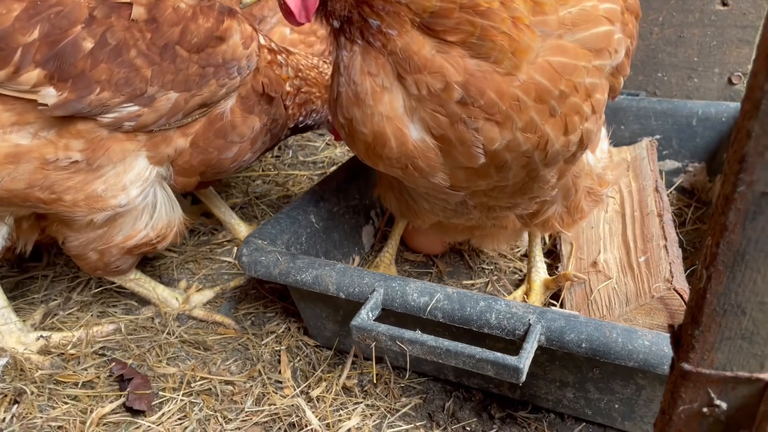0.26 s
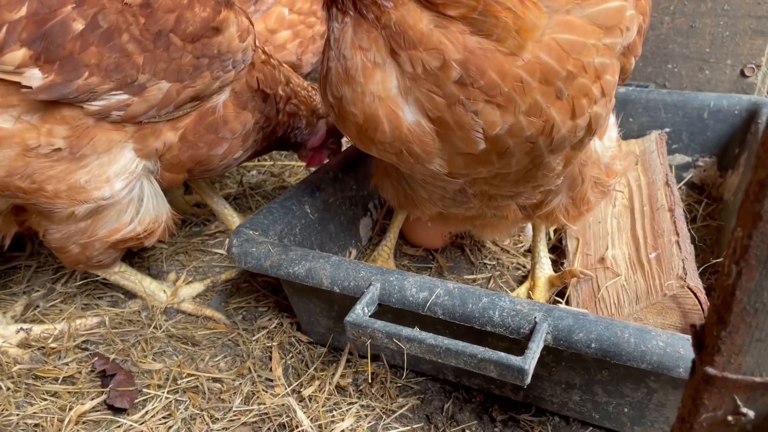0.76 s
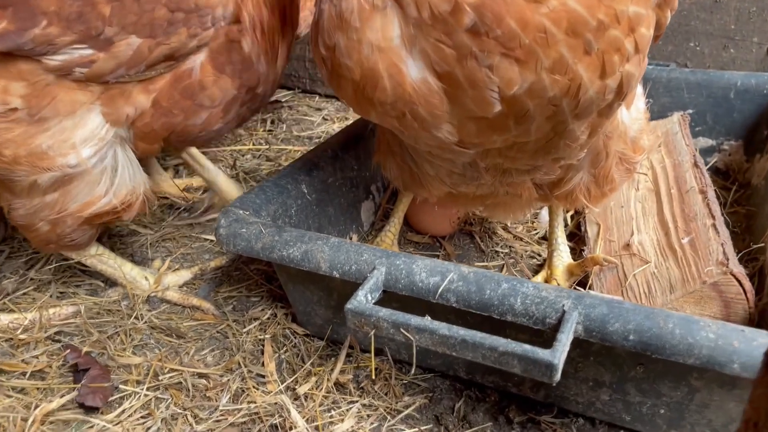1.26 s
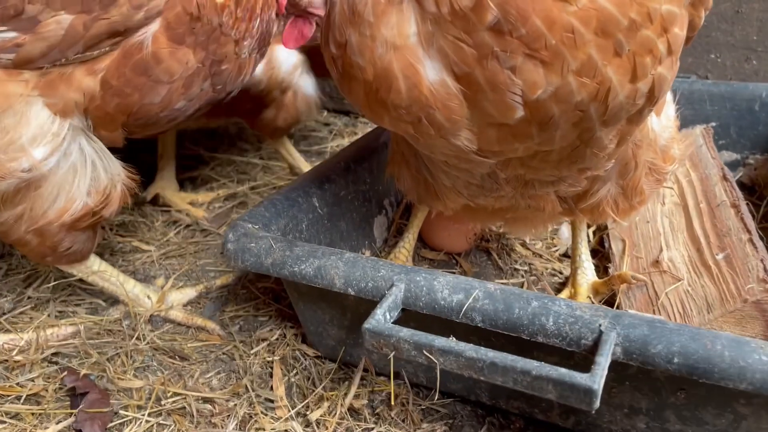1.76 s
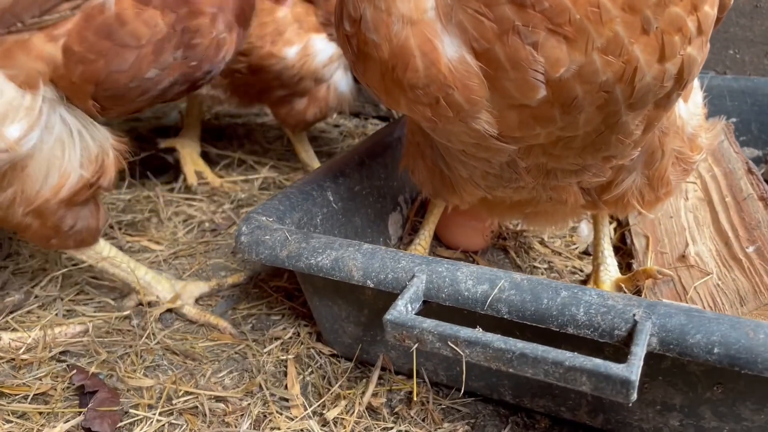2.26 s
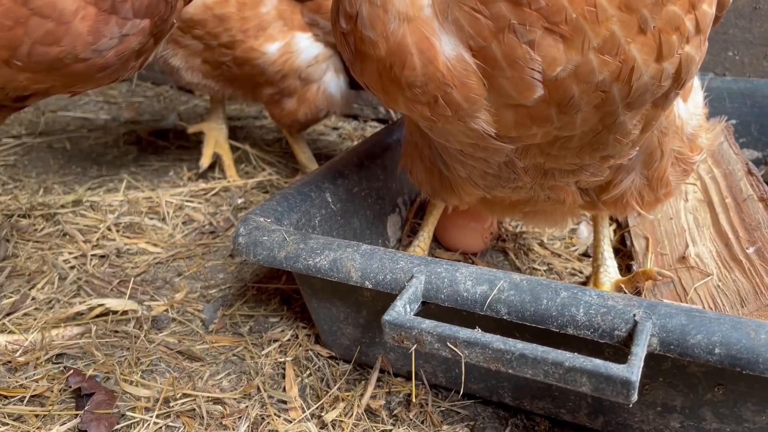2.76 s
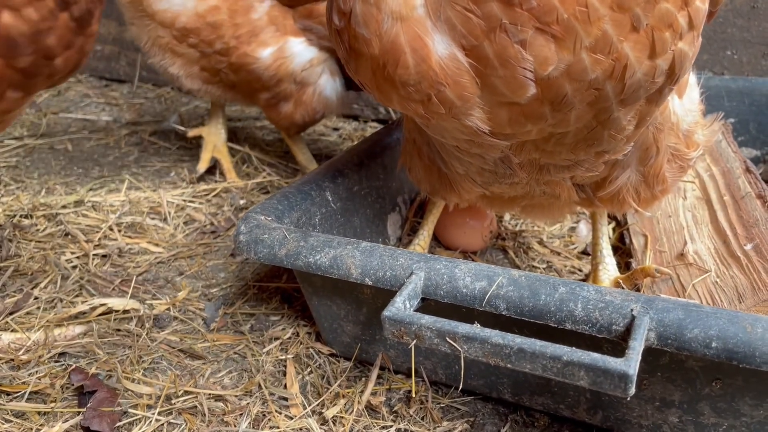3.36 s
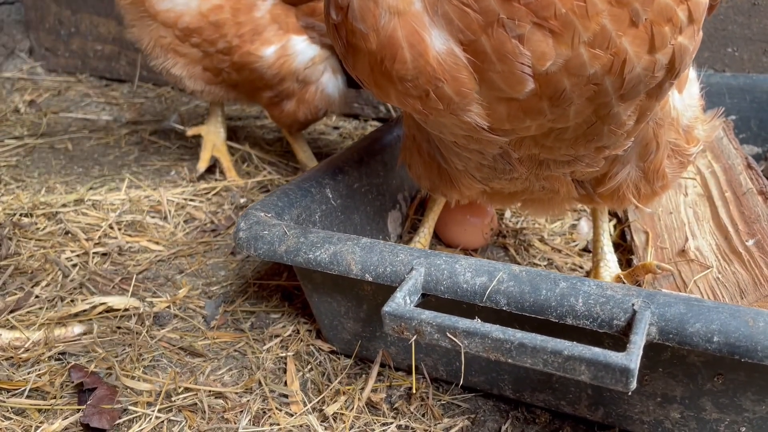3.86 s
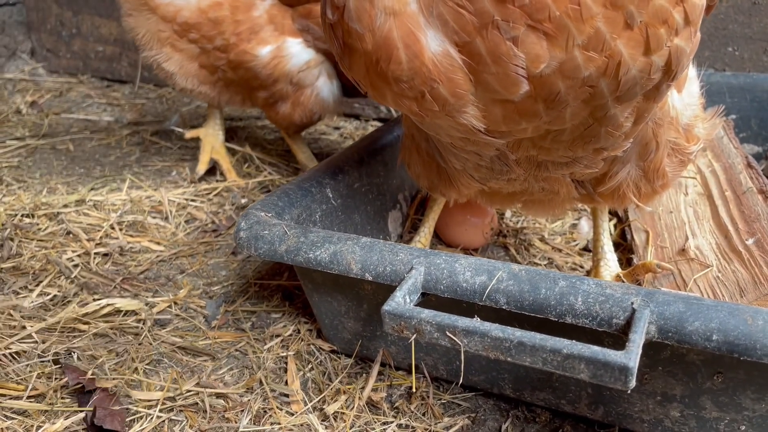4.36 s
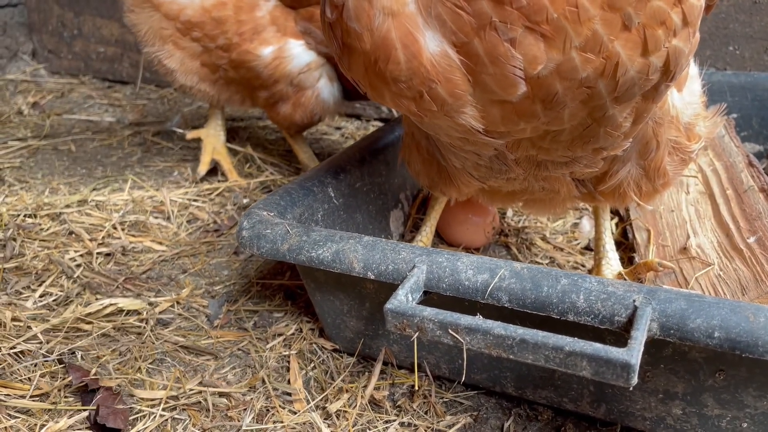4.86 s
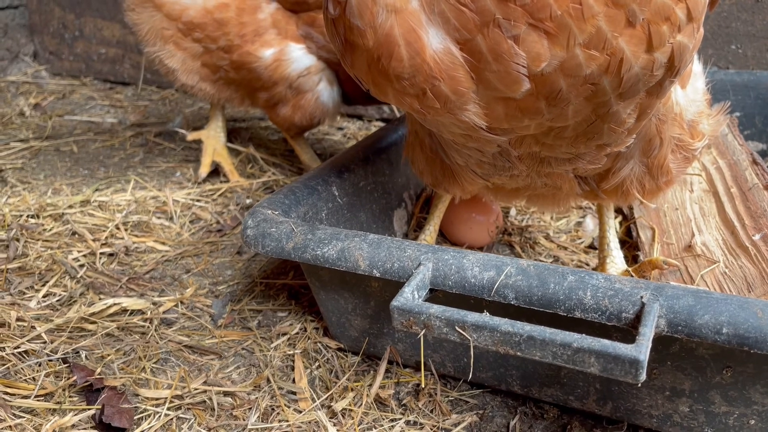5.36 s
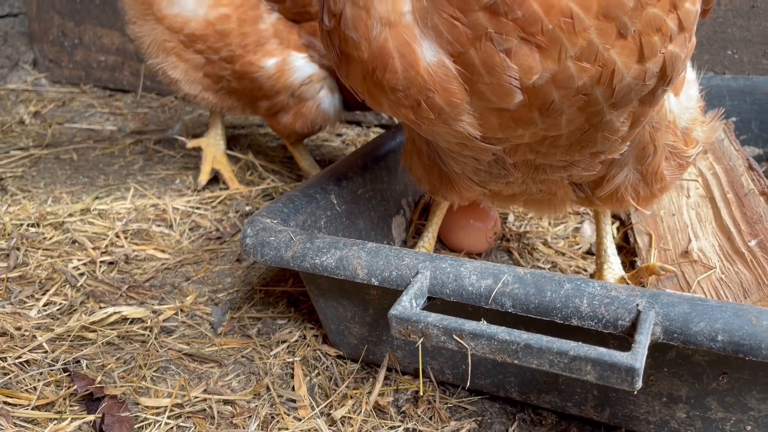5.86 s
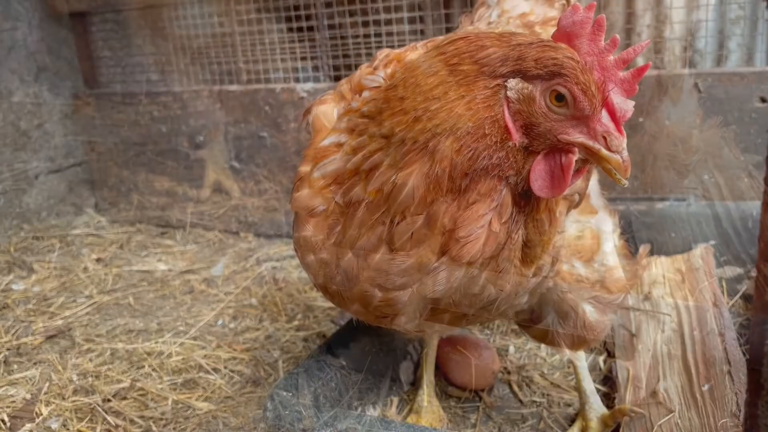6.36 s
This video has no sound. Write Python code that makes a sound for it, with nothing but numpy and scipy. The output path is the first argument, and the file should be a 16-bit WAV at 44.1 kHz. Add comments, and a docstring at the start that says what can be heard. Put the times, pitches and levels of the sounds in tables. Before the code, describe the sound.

Hoarse, drawn-out hen calls and a few short clucking notes, close up, over crackling straw, beak pecks and faint outdoor rumble.

```python
"""A low outdoor rumble with a faint hum lies under stirring straw; feet scuff, beaks peck, wood knocks, and soft
low thumps sound. A hen over her egg in a plastic tub then gives wavering calls: two thin squeaks, each breaking
into a raspy moan, with short calls, a third moan and a last short call after them. A small bird chirps outside
the wooden coop. Calls are drifting oscillators with sidebands and husk, straw and rumble are coloured noise,
pecks are noise bursts, taps and knocks are decaying sines; wall echoes and a diffuse tail make the coop."""
import sys
import numpy as np
from scipy import signal
from scipy.fft import rfft, irfft, next_fast_len
from scipy.io import wavfile

SR = 44100
rng = np.random.default_rng(int(sys.argv[2]) if len(sys.argv) > 2 else 0)


def dump_mix(stems):
    """Bounce the given channels to the path in sys.argv[1] as a 16-bit WAV at rate SR."""
    frames = np.atleast_2d(stems).T  # one column per channel
    limited = np.clip(frames, -1, 1)  # hard clip at full scale
    pcm = np.round(limited * 32767).astype(np.int16)
    wavfile.write(sys.argv[1], SR, pcm)


N = 291942
TIME = np.arange(N) / SR

# crisp top of straw and pecks: freq_hz, density_db_per_hz
CRISP_SPECTRUM = [(300, -76), (8000, -7), (9200, -5.5), (11000, -3), (13000, -13.5), (16000, -11)]


def from_db(db):
    """Decibels to amplitude gain."""
    return 10 ** (np.asarray(db) / 20)


def rms_one(x):
    """Scale to unit power."""
    return x / np.sqrt(np.mean(x ** 2) + 1e-20)


def in_time(rows):
    """Interpolate each column after time_s at every sample."""
    time_s, *columns = np.transpose(rows)
    return [np.interp(TIME, time_s, column) for column in columns]


def at_hz(points, hz):
    """Read a spectrum on a log-frequency axis."""
    freq_hz, value = np.array(points).T
    return np.interp(np.log(np.maximum(hz, 1)), np.log(freq_hz), value)


def drift(rate_hz):
    """Smooth random curve of unit rms: noise through two equal low-pass poles at rate_hz."""
    step = 20  # computed at SR / 20, then interpolated
    pole = np.exp(-2 * np.pi * rate_hz * step / SR)
    white = rng.standard_normal(N // step + 2002)
    slow = signal.lfilter([1], [1, -2 * pole, pole * pole], white)[2000:]
    return np.interp(np.arange(N) / step, np.arange(len(slow)), rms_one(slow))


def coloured(pair, spectrum):
    """Shape two unrelated signals and mix them as mid and side to a set stereo likeness; unit rms."""
    # freq_hz, left_right_likeness
    likeness = [(30, 0.065), (70, 1), (140, 0.85), (280, 0.78), (600, 0.12), (2000, 0.061), (6000, 0.28),
                (12000, 0.39)]
    size = next_fast_len(N)
    hz = np.arange(size // 2 + 1) * SR / size
    mid, side = rfft(pair, size) * from_db(at_hz(spectrum, hz))
    alike = np.clip(at_hz(likeness, hz), -1, 1)
    stereo = np.sqrt(1 + alike) * mid + np.sqrt(1 - alike) * side * [[1], [-1]]
    return rms_one(irfft(stereo, size)[:, :N])


def noise(spectrum):
    """Smooth stereo noise with the given spectrum."""
    return coloured(rng.standard_normal((2, N)), spectrum)


def gate(start_s, end_s, fade_s):
    """One between two times, with linear ramps inside."""
    return np.clip(np.minimum(TIME - start_s, end_s - TIME) / fade_s, 0, 1)


def turning(hz):
    """Phase of an oscillator that follows a pitch."""
    return 2 * np.pi * np.cumsum(hz) / SR


def coop(x, wet_db):
    """Diffuse ring of the coop: exponentially decaying noise, independent left and right."""
    t60_s, rise_s = 0.36, 0.0049
    age = TIME[:SR // 2]
    envelope = from_db(-60 * age / t60_s) * np.minimum(age / rise_s, 1)
    tail = rng.standard_normal((2, len(age))) * envelope
    tail /= np.sqrt(np.sum(tail ** 2, axis=1, keepdims=True))
    return from_db(wet_db) * signal.fftconvolve(np.atleast_2d(x), tail, axes=1)[:, :N]


def boards(x):
    """Early echoes off the nearest boards: delayed copies with a gain for each side."""
    # delay_s, left_gain, right_gain
    echoes = [(.0032, 0.0024, -0.19), (.0084, -0.46, 0.56), (0.019, -.15, .22), (0.0193, 0.077, -0.36)]
    return sum(np.interp(TIME - delay_s, TIME, x) * np.array([[left], [right]])
               for delay_s, left, right in echoes)


def rumble():
    """Low outdoor noise swells and sinks slowly."""
    # freq_hz, density_db_per_hz
    spectrum = [(15, -37), (25, -12), (54, 4), (113, -4.5), (152, -5), (243, -10.5), (264, -16),
                (355, -17.5), (439, -21), (521, -26.5), (604, -24), (1300, -34), (1780, -40.5), (2970, -53),
                (4000, -62.5), (5200, -88.5), (8800, -120)]
    # time_s, level_db
    level_curve = [(0, -37), (1.0, -36), (1.5, -34.5), (3.0, -37.5), (3.6, -34.5), (5.0, -37.5), (5.9, -35),
                   (6.15, -39), (6.6, -40)]
    return from_db(in_time(level_curve)[0]) * noise(spectrum)


def hum(waver_share=0.01193, swell_db=4.0):
    """Faint low tones outside drift in pitch and level around their means."""
    # mean_pitch_hz, mean_level_db
    tones = [(146, -55), (238, -53), (389, -65)]
    out = 0
    for hz, db in tones:
        level = np.sqrt(2) * from_db(db + swell_db * drift(3))
        out = out + level * np.sin(turning(hz * (1 + waver_share * drift(7.96))))
    return out


def rustle_levels():
    """Each movement builds and dies away exponentially over a faint stir; gains of rustle and crisp top."""
    # steps and feather shakes: peak_s, rise_s, fall_s, rustle_rel_db, crisp_rel_db
    movements = [(0.57, 0.11, 0.87, -69, -67), (0.926, 0.0072, 0.025, -45.5, -71),
                 (1.015, .02, 0.04, -64, -84), (1.419, 0.19, 0.17, -62, -55),
                 (1.547, 0.0099, 0.057, -50, -45.5), (1.69, 0.091, 0.06, -56.5, -59.5),
                 (2.08, 0.2, 0.16, -65.5, -63), (2.341, 0.097, 0.12, -55, -46),
                 (2.429, .02, 0.017, -56, -50), (2.975, 0.065, 0.061, -57, -47),
                 (3.249, 0.091, 0.052, -69, -56.5), (3.393, 0.018, 0.024, -60, -51),
                 (3.72, 0.083, 0.14, -69, -60.5), (3.891, 0.025, 0.013, -45, -43.5),
                 (4.071, 0.066, 0.081, -49, -39.5), (4.42, 0.065, 0.08, -56.5, -56),
                 (4.8, 0.036, 0.11, -63.5, -47.5), (5.149, 0.088, 0.16, -92, -58),
                 (5.551, 0.036, 0.041, -46, -37), (5.753, 0.023, 0.076, -53.5, -48),
                 (5.89, 0.014, 0.032, -63, -49.5), (6.099, 0.17, 0.094, -87, -58.5),
                 (6.55, 0.17, 0.046, -83.5, -63.5)]
    stir_rel_db, stir_crisp_rel_db = -78, -73
    power = from_db([[stir_rel_db], [stir_crisp_rel_db]]) ** 2
    for peak_s, rise_s, fall_s, rustle_db, crisp_db in movements:
        distance = np.maximum((peak_s - TIME) / rise_s, (TIME - peak_s) / fall_s)
        swell = np.exp(-distance.clip(0, 20))
        power = power + (from_db([[rustle_db], [crisp_db]]) * swell) ** 2
    return np.sqrt(power)


def straw(grain_db=2.5, rustle_db=8.5, crisp_db=0.5, snaps_per_s=35, snap_db=19):
    """Stalks rub in dense grains of uneven size; sparse random snaps stand out."""
    # freq_hz, density_db_per_hz
    spectrum = [(300, 9.5), (700, -11), (1500, 2), (2500, 2.5), (4000, 1), (6500, -3.5), (7500, -8),
                (8300, -16.5), (16000, -49)]
    rustle, crisp = rustle_levels()
    grain_level = from_db(grain_db * np.clip(drift(610), -3, 3) + drift(24))
    grains = rng.standard_normal((2, N)) * grain_level
    snaps = (rng.random(N) < snaps_per_s / SR) * rng.standard_normal(N) * from_db(snap_db)
    grains = grains + snaps * np.array([[1], [.5]])  # mid, side
    body = rustle * from_db(rustle_db) * coloured(grains, spectrum)
    return body + crisp * from_db(crisp_db) * coloured(grains, CRISP_SPECTRUM)


def scuffs():
    """A foot drags on tub or floor: a Gaussian swell of dull, grainy noise."""
    # centre_s, length_s, level_db
    drags = [(0.303, 0.013, -46.5), (0.579, 0.082, -45), (0.75, 0.15, -58.5), (0.827, 0.016, -50),
             (0.9, 0.041, -48), (0.957, 0.019, -40), (1, 0.045, -51.5), (1.095, 0.021, -43),
             (1.678, 0.039, -46), (5.572, 0.034, -51), (6.557, 0.076, -47.5)]
    # freq_hz, density_db_per_hz
    spectrum = [(200, -31), (600, 16.5), (1200, 6), (2500, -3.5), (4000, -24), (8000, -38)]
    swell = sum(from_db(db) * np.exp(-2 * ((TIME - s) / length_s) ** 2) for s, length_s, db in drags)
    return swell * from_db(4 * np.tanh(drift(70))) * noise(spectrum)


def pecks(tail_db=-16, split_hz=8000):
    """Pecks and snapping straws: a dry crack of noise followed by a short scatter of straw."""
    # start_s, level_db, crisp_top_vs_body_db
    strikes = [(0.498, -62, 2), (0.9213, -33, -9), (1.6785, -44.5, 11), (1.681, -34.5, 18),
               (1.6925, -47, -4), (2.244, -39, 16), (2.413, -33, 25.5), (2.8506, -38, 18),
               (2.9475, -31.5, 4), (2.983, -27, 6.5), (3.2819, -20.5, 0), (3.857, -19, -2.5),
               (3.8882, -33, -12), (3.906, -16.5, -11), (3.9582, -16.5, 9), (4.004, -26.5, -6),
               (4.064, -16.5, -3), (4.328, -20.5, -3), (4.414, -37, 8), (4.446, -42, 6), (4.4629, -32, -6),
               (4.851, -29.5, 22), (4.8918, -35, 6), (5.124, -38, 6), (5.449, -40, -4),
               (5.4928, -33.5, -7.5), (5.74, -30, 12)]
    # freq_hz, density_db_per_hz
    body_spectrum = [(1120, -19), (1900, -3.5), (2170, -2), (2810, -4.5), (5020, -12.5), (5640, -13.5),
                     (6390, -5.5), (7980, -30), (11000, -11.5), (16000, -26)]
    crack_s, scatter_s = .0013, .012
    body, top = np.zeros(N), np.zeros(N)
    age = TIME[:SR // 10]
    shape = np.exp(-age / crack_s) + from_db(tail_db) * np.exp(-age / scatter_s)
    for start_s, level_db, treble_db in strikes:
        at = round(start_s * SR)
        total = np.hypot(1, from_db(treble_db))  # body and top share the power
        body[at:at + len(age)] += shape * from_db(level_db) / total
        top[at:at + len(age)] += shape * from_db(level_db + treble_db) / total
    dull = signal.butter(4, split_hz, fs=SR, output="sos")
    knock = body * rms_one(signal.sosfilt(dull, noise(body_spectrum)))
    return knock + top * noise(CRISP_SPECTRUM) + coop(knock, wet_db=-10)


def thumps():
    """Soft, deep thumps: low sines under a Gaussian swell."""
    # centre_s, pitch_hz, level_db
    thump_rows = [(0.75, 70, -29.5), (0.995, 159, -35), (1.125, 63.5, -27), (1.24, 73, -29.5),
                  (5.481, 115, -38.5), (5.96, 127, -32.5)]
    width_s = 0.031
    return sum(from_db(db) * np.exp(-((TIME - s) / width_s) ** 2) * np.sin(2 * np.pi * hz * (TIME - s))
               for s, hz, db in thump_rows)


def knocks(wet_db=-6):
    """A foot bumps the wood: one short, hollow decaying note."""
    # start_s, level_db
    bumps = [(0.878, -34), (0.919, -34), (0.946, -35)]
    pitch_hz, t60_s, rise_s = 1217, .04, .002
    out, age = np.zeros(N), TIME[:SR // 10]
    ring = np.sin(2 * np.pi * pitch_hz * age) * from_db(-60 * age / t60_s) * np.minimum(age / rise_s, 1)
    for start_s, db in bumps:
        at = round(start_s * SR)
        out[at:at + len(age)] += from_db(db) * ring
    return out + coop(out, wet_db)


def squeaks(flutter_db=4.5, level_db=-4.0, octave_db=-42, under_ratio=.88):
    """The tight syrinx gives an unsteady near-sine; its other side sounds weakly a little lower."""
    # one curve a squeak: time_s, pitch_hz, level_rel_db
    curves = [
        [(1.08, 651, -52), (1.112, 635, -42), (1.125, 807, -35.5), (1.25, 760, -35), (1.385, 820, -34.5),
         (1.46, 794, -28), (1.5, 798, -32), (1.58, 812, -27.5), (1.628, 858, -39), (1.643, 936, -17.5),
         (1.668, 866, -37.5), (1.685, 858, -21), (1.705, 840, -33), (1.76, 887, -17.5), (1.81, 839, -33.5),
         (1.882, 882, -14), (1.905, 960, -21), (1.915, 869, -25.5), (1.96, 964, -27)],
        [(3.405, 930, -45), (3.443, 1020, -24.5), (3.457, 1017, -33.5), (3.468, 940, -24), (3.51, 952, -23.5),
         (3.55, 910, -33)],
    ]
    # lower tone of each squeak: level_vs_main_tone_db
    under_levels = [-8.5, -13]
    out = 0
    for rows, under_db in zip(curves, under_levels):
        hz, db = in_time(rows)
        phase = turning(hz * (1 + .018 * drift(70)))
        under_phase = turning(hz * under_ratio * (1 + 0.0643 * drift(68)))
        tone = np.sin(phase) + from_db(octave_db) * np.sin(2 * phase)
        tone = tone + from_db(under_db) * np.sin(under_phase)
        level = from_db(db + level_db + flutter_db * np.tanh(drift(41)))
        out = out + np.sqrt(2) * tone * level * gate(rows[0][0], rows[-1][0], 0.011)
    return out


def taps():
    """Beak or claw hits the tub: the stiff plastic rings briefly in several modes."""
    # start_s, level_db
    contacts = [(1.681, -34), (1.6835, -34), (1.69, -40.5), (4.064, -18.5)]
    # mode_hz, mode_level_rel_db, t60_s
    tub_modes = [(2300, -8, .025), (3300, -5, .015), (4150, -3.5, .018), (4650, 1, .014), (5050, -1, .018),
                 (6200, -4, .012)]
    out, age = np.zeros((2, N)), TIME[:SR // 10]
    for start_s, db in contacts:
        at = round(start_s * SR)
        for hz, mode_db, t60_s in tub_modes:
            tap_hz = hz * (1 + 0.0051 * rng.standard_normal())
            ring = np.sin(2 * np.pi * tap_hz * age + rng.uniform(0, np.pi, (2, 1)))
            out[:, at:at + len(age)] += from_db(db + mode_db - 60 * age / t60_s) * ring
    return out + coop(out, wet_db=-19)


def bird(partial_db=-7):
    """Husky chirps glide ever faster to their end pitch; strongest on their second harmonic."""
    # start_s, length_s, start_pitch_hz, end_pitch_hz, level_db
    chirp_rows = [(1.862, 0.04, 3450, 3400, -58), (5.082, 0.085, 3240, 2630, -48.5),
                  (5.665, 0.061, 2440, 2130, -56), (5.68, 0.045, 4640, 4420, -55),
                  (6.405, 0.057, 3460, 3100, -62.5), (6.516, 0.074, 3940, 3580, -61.5)]
    out, shake = np.zeros(N), 1 + .05 * drift(400)
    for start_s, length_s, start_hz, end_hz, db in chirp_rows:
        span = (TIME > start_s) & (TIME < start_s + length_s)
        along = (TIME[span] - start_s) / length_s
        phase = turning((start_hz + (end_hz - start_hz) * along ** 2) * shake[span]) / 2
        partials = np.sin(3 * phase) + np.sin(4 * phase) / 2
        tone = np.sin(2 * phase) + from_db(partial_db) * partials
        out[span] += from_db(db) * np.sin(np.pi * along) * tone
    return out


def husk_noise():
    """Slow complex noise, centred a little below zero: on a tone it becomes a hoarse band."""
    width_hz, below_hz = 90, 25
    sos = signal.butter(3, width_hz, fs=SR, output="sos")
    real, imaginary = rms_one(signal.sosfilt(sos, rng.standard_normal((2, N))))
    return (real + 1j * imaginary) / np.sqrt(2) * np.exp(-2j * np.pi * below_hz * TIME)


def octave_breaks():
    """Gain of the octave: it rattles in the rough stretches and drops out at each catch."""
    # time_s, rattle_depth_0_to_1
    depth_curve = [(2.2, .6), (2.35, .6), (2.37, .05), (2.57, .05), (2.6, .45), (2.69, .2), (2.76, .5),
                   (2.81, .5), (2.84, .1), (3.0, .3), (3.55, .5), (3.65, .1), (4.4, .05), (4.5, .8),
                   (4.7, .7), (4.8, .45), (4.83, .05)]
    # instants at which the voice catches: time_s
    catch_times = [2.468, 2.61, 2.662, 2.728, 2.765, 2.817, 3.04, 3.783, 3.808, 3.882, 4.024, 4.059, 4.77,
                   4.875, 4.929]
    rattle_hz, catch_s = 66, .0055
    rattle = in_time(depth_curve)[0] * np.sin(turning(rattle_hz * (1 + .22 * drift(40))))
    held = np.prod([1 - np.exp(-((TIME - s) / catch_s) ** 2) for s in catch_times], axis=0)
    return (1 + rattle) * held


def calls(curves, jitter, flutter_db, octave_db, base_db, rasp_db, beat_hz, low_share, buzz_db=0,
          beak_half_width_hz=170):
    """Syrinx harmonics through the throat; irregular beating adds sidebands and hoarseness at the octave."""
    # overtone gain against the whole voice: freq_hz, gain_rel_db
    throat = [(1800, -32), (2300, -56), (2870, -38), (3000, -46), (3450, -43), (3650, -48), (4100, -56),
              (4650, -48), (5250, -51), (5800, -62)]
    # nasal resonance of the open beak: time_s, centre_hz, gain_rel_db
    beak = [(1.95, 3350, -50), (2.22, 3150, -37), (2.3, 3215, -41), (2.56, 3340, -34), (2.63, 3194, -28.5),
            (2.74, 3230, -26.5), (2.805, 3544, -23), (2.87, 3637, -39), (3.05, 3600, -33.5),
            (3.54, 2970, -30), (3.58, 3060, -23.5), (3.63, 2970, -44), (3.7, 3210, -47.5),
            (4.1, 3360, -49.5), (4.2, 2105, -26), (4.42, 2180, -22), (4.5, 4020, -51), (4.65, 4070, -44),
            (4.8, 4120, -38.5), (4.92, 4130, -38), (6.4, 3480, -58)]
    # pitch stagger at register changes: time_s, spread_share_of_pitch
    unsteady = [(1.92, .035), (2.05, .035), (2.065, .005), (2.1, .005), (2.125, .045), (2.16, .015),
                (2.22, .035), (2.26, 0), (3.5, 0), (3.53, .03), (3.61, 0), (4.48, 0), (4.5, .018),
                (4.6, .012), (4.75, 0), (6.49, 0), (6.52, .04), (6.56, .08)]
    husk_db = -3.5
    third_husk, least_upper_husk = 1.4, .5  # noise against tone: third harmonic, those above
    out = np.zeros(N)
    beak_hz, beak_db = in_time(beak)
    quaver = np.sin(turning(13 * (1 + 0.235 * drift(12.1))))  # muscles tremble in pitch and loudness
    stagger = in_time(unsteady)[0] * drift(90)
    wobble = 1 + jitter * (quaver + drift(45)) + 0.0055 * drift(200) + stagger
    beat = turning(beat_hz * (1 + 0.2 * drift(60)))
    flutter = flutter_db * np.tanh(drift(36) + quaver / 2)
    sway = flutter_db * np.tanh(drift(71))  # the fundamental swells on its own
    breaks = octave_breaks()
    grit, rattle = from_db(2.5 * np.tanh(drift(90))), drift(130)
    husk = from_db(husk_db) * husk_noise()
    upper_husk = husk_noise()
    for rows in curves:
        start_s, end_s = rows[0][0], rows[-1][0]
        span = (TIME > start_s) & (TIME < end_s)
        hz, first, second, rasp = [column[span] for column in in_time(rows)]
        phase, b, shake = turning(hz * wobble[span]), beat[span], flutter[span]
        fundamental = from_db(first + base_db + sway[span]) * np.sin(phase)
        octave = from_db(second + octave_db + shake) * breaks[span] * np.sin(2 * phase)

        # the throat rings near 1 kHz, so the sideband below the octave outweighs the one above
        sidebands = np.sin(2 * phase - b) + 0.094 * np.sin(2 * phase + b)
        sidebands += 0.1 * np.sin(phase + b) + low_share * np.sin(phase - b)
        sidebands += np.imag(husk[span] * np.exp(2j * phase))

        # the raspier the voice, the more its overtones smear
        effort = np.sqrt(from_db(first) ** 2 / 2 + from_db(second) ** 2 + from_db(rasp) ** 2)
        rasp_share = from_db(rasp) / effort
        smear = (.1 + 1.5 * rasp_share) * rattle[span]
        buzz = 0
        for k in range(3, 11):
            off_centre = (k * hz - beak_hz[span]) / beak_half_width_hz
            nasal = from_db(beak_db[span]) / (1 + off_centre ** 2)
            hoarse = third_husk if k == 3 else least_upper_husk + rasp_share
            hoarse_band = np.imag(upper_husk[span] * np.exp(1j * k * phase))
            overtone = np.sin(k * phase + smear) + hoarse * hoarse_band
            buzz = buzz + (from_db(at_hz(throat, k * hz)) + nasal) * overtone

        # rasp moves against the octave's flutter
        rough = from_db(rasp + rasp_db - shake / 2) * sidebands
        voice = fundamental + octave + grit[span] * (rough + from_db(buzz_db) * effort * buzz)
        out[span] += np.sqrt(2) * voice * gate(start_s, end_s, 0.008)[span]
    return out


def moans():
    """Full register: a strong, raspy octave over the fundamental, with sidebands from a fast, irregular beat."""
    # one curve a moan: time_s, pitch_hz, fundamental_rel_db, octave_rel_db, rasp_rel_db
    curves = [
        [(1.915, 690, -32.5, -62.5, -65), (2.0, 690, -32, -53, -63), (2.09, 679, -22, -44, -69),
         (2.13, 641, -34, -43, -37), (2.17, 664.5, -27.5, -48, -51), (2.235, 650.4, -29.5, -37, -51.5),
         (2.258, 583.4, -27, -29, -31.5), (2.3, 574.5, -33.5, -43, -30.5), (2.354, 586.4, -25, -28.5, -25.5),
         (2.378, 571.6, -40, -18, -40.5), (2.406, 578, -26.5, -26.5, -31), (2.436, 562.7, -38, -16.5, -45.5),
         (2.472, 575, -27.5, -27, -33), (2.5, 575.8, -38, -22.5, -27.5), (2.565, 576, -28.5, -20.5, -47.5),
         (2.594, 570.4, -31, -25.5, -31), (2.625, 577, -32, -21, -26.5), (2.658, 580.3, -32, -29, -33),
         (2.7, 572.4, -34.5, -21, -37), (2.772, 582.4, -31, -32, -36), (2.836, 593.7, -27, -21, -43),
         (2.91, 604.3, -30, -21.5, -39), (2.975, 598, -34.5, -28.5, -36.5), (3.025, 588, -30, -30, -47),
         (3.08, 559, -62, -46, -65)],
        [(3.515, 673, -40, -55.5, -49), (3.532, 667, -26.5, -64, -39.5), (3.542, 632, -26.5, -34, -39.5),
         (3.588, 631.6, -28.5, -35, -58), (3.63, 559.3, -31.5, -25, -49.5), (3.72, 579, -27.5, -27.5, -49),
         (3.775, 555.7, -27.5, -17.5, -52), (3.835, 574, -26, -21.5, -51), (3.862, 542.5, -29, -16.5, -46),
         (3.886, 573, -31.5, -17, -41.5), (3.916, 543.4, -40, -16.5, -52), (3.945, 573.4, -26.5, -21.5, -47),
         (4.01, 572, -29.5, -23.5, -63), (4.076, 569, -28, -20.5, -47.5), (4.1, 583.3, -26.5, -21.5, -56),
         (4.128, 571, -41, -22, -34), (4.14, 613, -14, -49, -34)],
        [(4.47, 660, -42, -56, -51), (4.5, 597, -34.5, -41, -44.5), (4.57, 597.5, -34, -38, -37),
         (4.615, 600, -29, -27, -34), (4.655, 598, -28, -44, -33), (4.68, 592, -34, -28.5, -25),
         (4.7, 605, -27.5, -33.5, -42), (4.725, 595, -32, -27.5, -33), (4.76, 592, -27, -28.5, -39),
         (4.785, 599.4, -31.5, -25.5, -44.5), (4.846, 598.4, -30, -20.5, -54),
         (4.886, 590.6, -31.5, -35.5, -39), (4.912, 566, -33, -21.5, -61), (4.93, 588, -44, -34.5, -63),
         (4.97, 572, -45, -53, -64)],
    ]
    return calls(curves, jitter=.003, flutter_db=2.5, octave_db=1.5, base_db=-1.5, rasp_db=-2.0,
                 beat_hz=226, low_share=0.18)


def short_calls():
    """Short calls drop onto their note and may end in a creak; their overtones are duller than a moan's."""
    # one curve a call: time_s, pitch_hz, fundamental_rel_db, octave_rel_db, rasp_rel_db
    curves = [
        [(4.09, 706, -44, -67, -65), (4.15, 719.5, -28, -40, -42), (4.182, 702, -41.5, -27.5, -49),
         (4.205, 716.4, -21.5, -30, -63), (4.245, 675, -39, -24, -44), (4.268, 748, -31, -72, -55),
         (4.28, 732, -44, -65, -58), (4.34, 723, -45, -66, -57)],
        [(4.361, 815, -23, -62, -49), (4.369, 820, -32.5, -62, -47), (4.384, 705, -27.5, -24, -49),
         (4.425, 713, -20, -28, -52), (4.436, 705, -39, -43, -57), (4.455, 736, -40, -58, -52),
         (4.48, 723, -38, -61, -55)],
        [(6.325, 705, -50, -77, -77), (6.346, 702, -41, -57, -61), (6.4, 669, -35, -44, -58),
         (6.42, 690, -25.5, -41, -65), (6.437, 675, -31, -47, -65), (6.462, 680, -24.5, -37, -68),
         (6.487, 688, -23.5, -45, -67), (6.496, 767, -30.5, -39, -58), (6.508, 682, -26.5, -33.5, -54),
         (6.516, 680, -36.5, -58, -43), (6.53, 727, -35, -48, -45), (6.548, 694, -45, -65, -52),
         (6.58, 663, -52, -72, -50), (6.605, 657, -60, -75, -60)],
    ]
    return calls(curves, jitter=0.0066, flutter_db=2.0, octave_db=-9.5, base_db=-0.1, rasp_db=-4.0,
                 beat_hz=360.0, low_share=1.0, buzz_db=-8)


def hen_in_coop():
    """The hen turns her head, which shifts the stereo balance; boards and coop answer her voice."""
    # time_s, left_minus_right_db
    head = [(1.1, 1), (1.4, 6.5), (1.7, -1), (2.4, 4), (2.68, 2.5), (2.8, 2.5), (3.05, 9.5), (3.6, -1.5),
            (4.05, -7), (4.25, 10), (4.8, 3.5), (6.45, 6.5)]
    left_lag_s = .00009
    hen = squeaks() + moans() + short_calls()
    pan_db = in_time(head)[0]
    left = np.interp(TIME - left_lag_s, TIME, hen) * from_db(pan_db / 2)
    direct = np.array([left, hen * from_db(-pan_db / 2)])
    return direct + boards(hen) + coop(hen, wet_db=-12)


def scene():
    """Outdoor bed, straw and contact sounds, the hen, and the bird with its coop ring."""
    bed = rumble() + hum() + straw()
    contacts = scuffs() + pecks() + thumps() + knocks() + taps()
    chirps = bird()
    return bed + contacts + hen_in_coop() + chirps + coop(chirps, wet_db=-8)


def record(dry):
    """The microphone has a narrow dip in the treble; a steep low-pass cuts the top."""
    dip_hz, dip_q, cutoff_hz = 8150, 5.5, 16200
    dipped = signal.lfilter(*signal.iirnotch(dip_hz, dip_q, fs=SR), dry)
    return signal.sosfilt(signal.ellip(10, .1, 80, cutoff_hz, fs=SR, output="sos"), dipped)


dry = scene()
out = record(dry)
dump_mix(out)
```